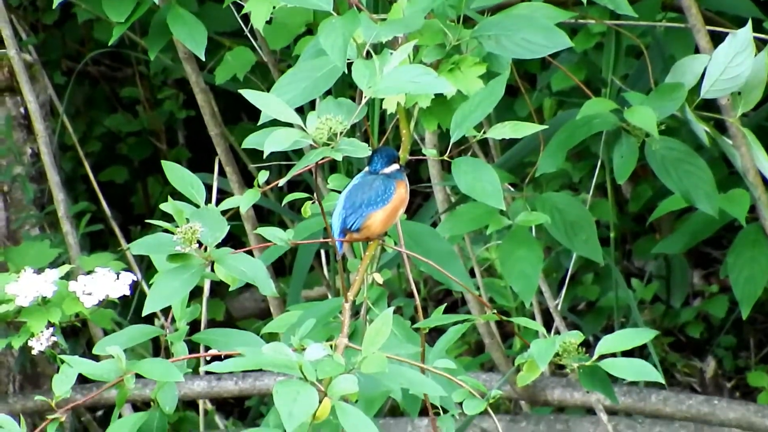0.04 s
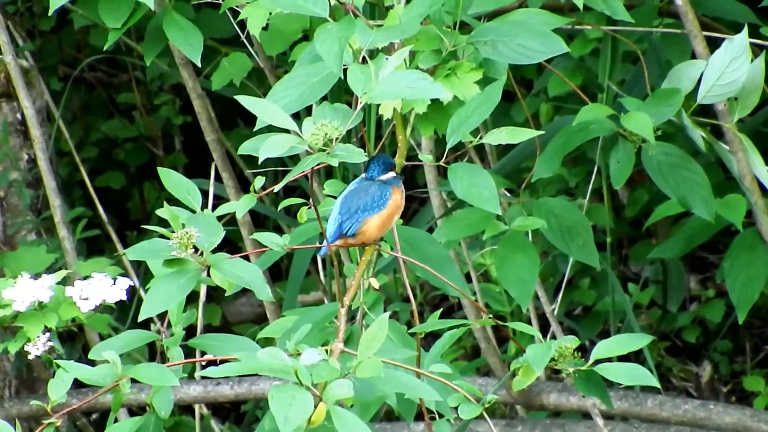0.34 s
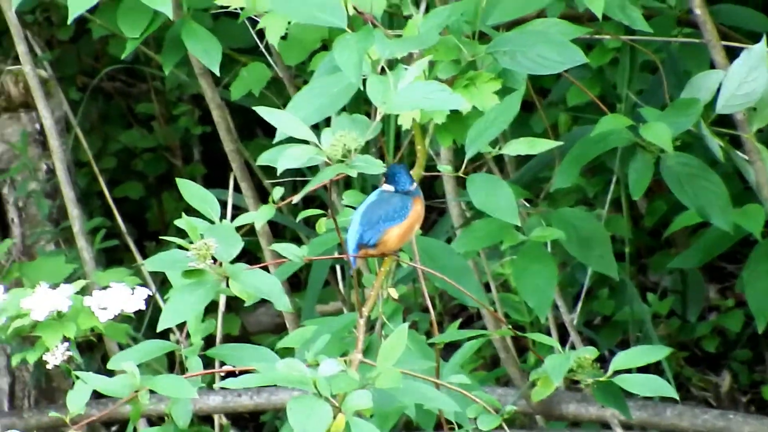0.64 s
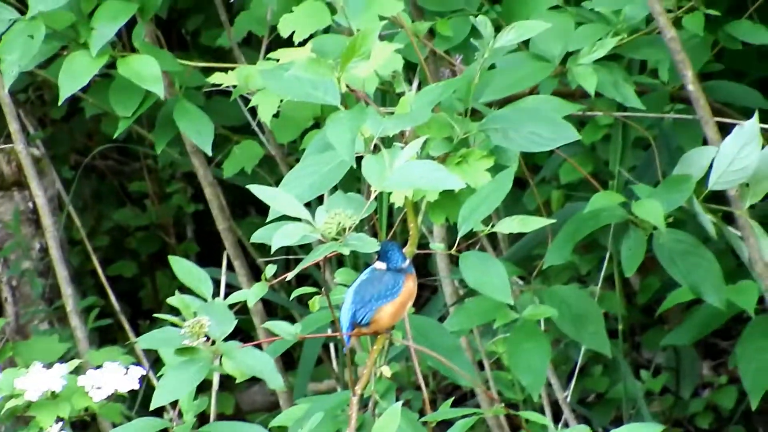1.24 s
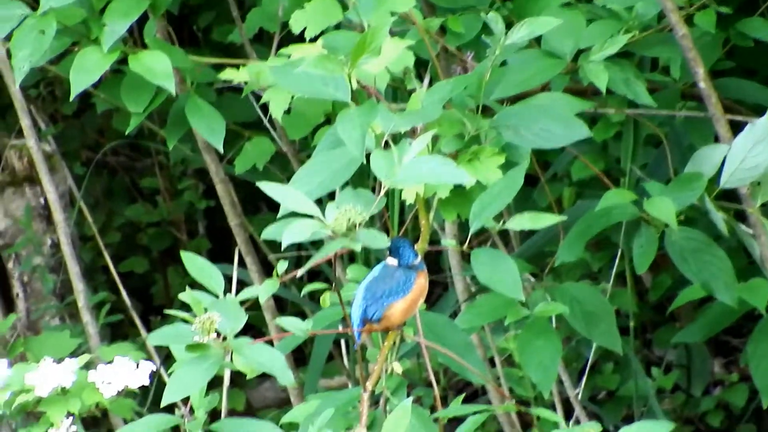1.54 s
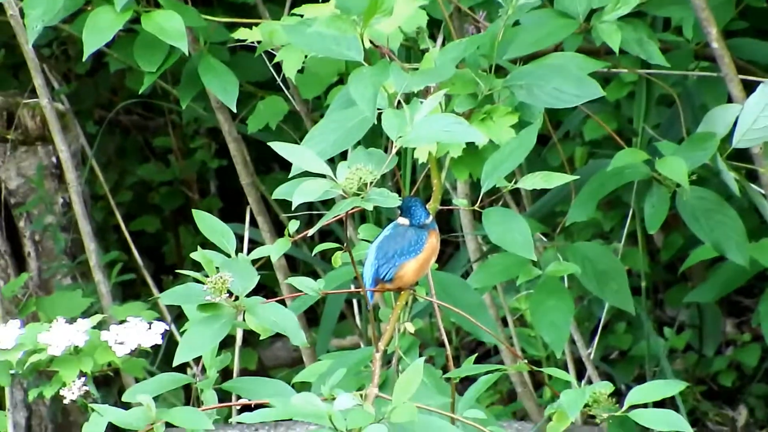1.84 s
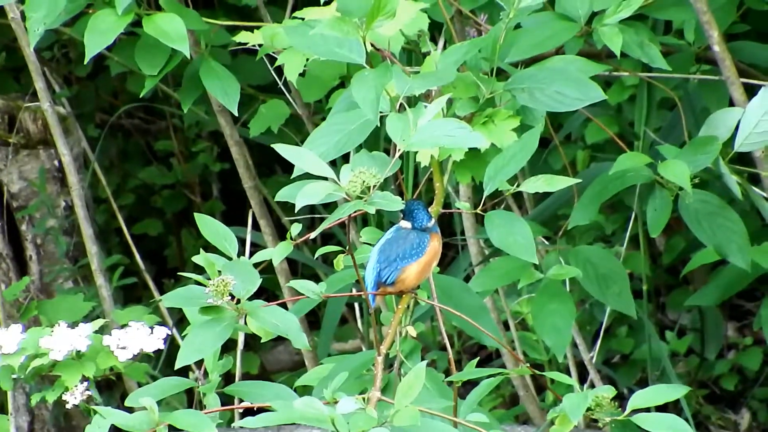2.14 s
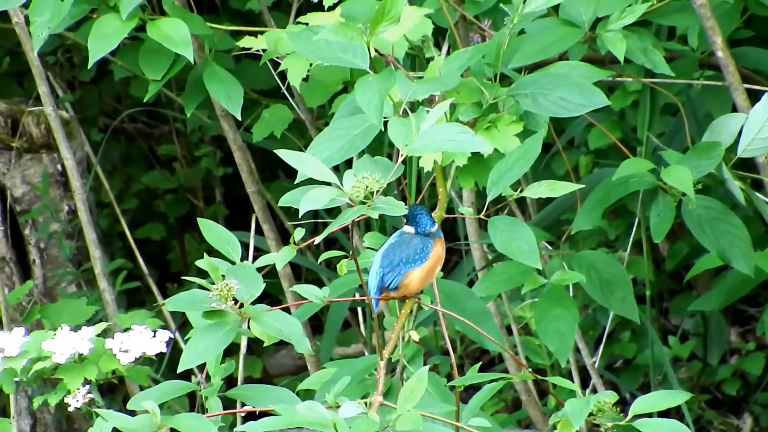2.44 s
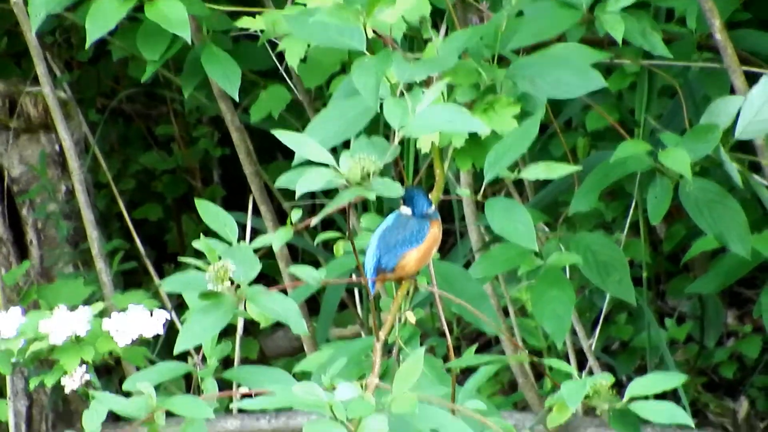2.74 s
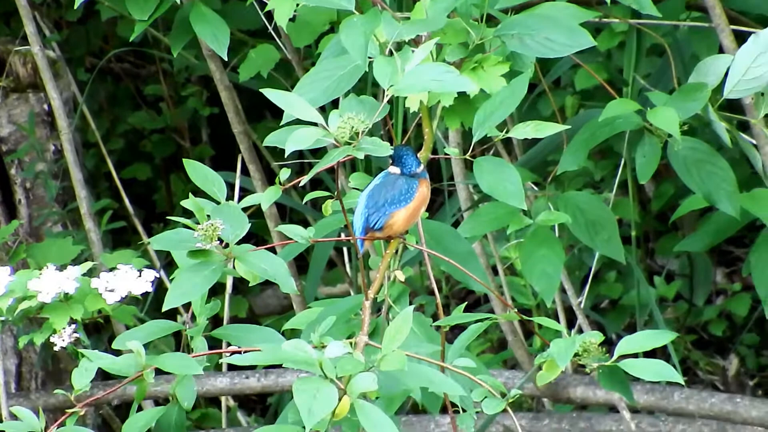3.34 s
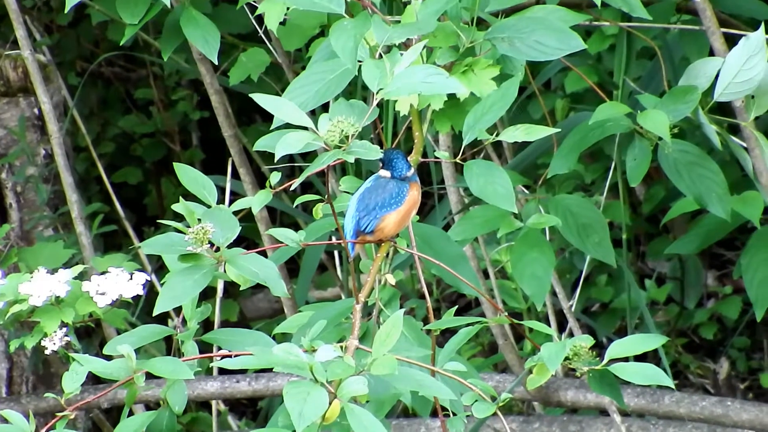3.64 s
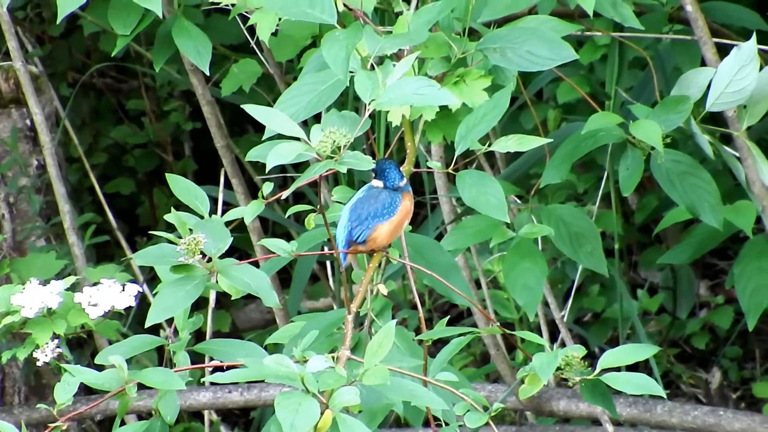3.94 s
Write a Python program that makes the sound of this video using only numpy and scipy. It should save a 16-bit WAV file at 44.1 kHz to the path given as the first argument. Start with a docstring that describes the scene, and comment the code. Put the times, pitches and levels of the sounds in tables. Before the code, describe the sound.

A stream rushes and bubbles steadily beside a wooded bank. Small birds chirp and rasp nearby at first, one whistle sweeps up, then a lower, distant song grows fuller. Soft puffs of air touch the microphone.

```python
"""On a wooded bank, a stereo microphone beside a steadily rushing, bubbling stream. Soft puffs of air
touch it at the start and now and then later. In the first second and a half small birds chirp and rasp
close by in the leaves, a lower song slurs down from deep in the trees, and very high two-voiced calls
begin. Just after two seconds one whistle sweeps up and holds; the far song is fullest near the end."""
import sys
import numpy as np
from scipy import signal
from scipy.fft import rfft, irfft
from scipy.io import wavfile

SR = 44100
rng = np.random.default_rng(int(sys.argv[2]) if len(sys.argv) > 2 else 0)


def transcribe(signal):
    """Save signal, clipped to [-1, 1], as a 16-bit WAV file at the path in sys.argv[1]."""
    frames = np.atleast_2d(signal).T
    limited = np.clip(frames, -1, 1)
    pcm = np.round(limited * 32767).astype(np.int16)
    wavfile.write(sys.argv[1], SR, pcm)


N = 176400
TIME = np.arange(N) / SR


def from_db(db):
    """Decibels to gain."""
    return 10 ** (np.asarray(db) / 20)


def rms_one(x):
    """Scale to unit power."""
    return x / np.sqrt(np.mean(x ** 2) + 1e-20)


def drift(rate_hz):
    """Smooth random wandering with a spread of 1."""
    hz = np.arange(N // 2 + 1) * SR / N
    return rms_one(irfft(rfft(rng.standard_normal(N)) / (1 + (hz / rate_hz) ** 2), N))


def density(points, hz):
    """Gain that gives unit white noise the listed level per hertz."""
    at, db = np.transpose(points)
    return from_db(np.interp(np.log(hz + 1), np.log(at), db)) * np.sqrt(SR / 2)


def add(track, s, sound):
    """Mix a sound into a track at a time."""
    start = max(int(s * SR), 0)
    part = sound[:max(N - start, 0)]
    track[start:start + len(part)] += part


def tone(hz):
    """A sine on a pitch path that swells and fades."""
    return np.sin(np.pi * np.linspace(0, 1, len(hz))) * np.sin(2 * np.pi * np.cumsum(hz) / SR)


def notes(rows, swing, swing_hz, turn):
    """Bird notes glide unsteadily through three pitches, turning after a share of their length."""
    out, wobble = np.zeros(N), 1 + swing * drift(swing_hz)
    for s, length, start, middle, end, db in rows:
        hz = np.interp(np.linspace(0, 1, int(length * SR)), [0, turn, 1], [start, middle, end])
        add(out, s, from_db(db) * tone(hz * np.roll(wobble, -int(s * SR))[:len(hz)]))
    return out


def wood(x, echo_db, t60, first_echo_s=0.0097, echoes_per_s=900, width=0.24):
    """Trunks and leaves around the microphone scatter many small dying echoes; stereo."""
    t = TIME[:SR]
    taps = rng.standard_normal((2, SR)) * (rng.random((2, SR)) < echoes_per_s / SR)
    taps = taps * from_db(-60 * t / t60) * (t > first_echo_s)
    mid, side = (signal.fftconvolve(x, h / np.sqrt(np.sum(h ** 2) + 1e-20))[:N] for h in taps)
    return from_db(echo_db) * np.array([mid + width * side, mid - width * side])


def trunk(x, delay_s=0.027, echo_db=-10):
    """A nearby trunk throws back one distinct echo."""
    return from_db(echo_db) * np.interp(TIME - delay_s, TIME, x, left=0)


def stream_rush(flicker_db=0.75, flicker_hz=15, swell_above_hz=1800):
    """Heard from the bank, countless splashes merge into noise whose half-octave bands flicker apart."""
    # rush common to both channels: f/Hz, level/dB per Hz
    centre = [(30, -134), (65, -116), (110, -115), (190, -99.5), (270, -90.5), (420, -86.5), (600, -87.5),
              (800, -85), (1300, -85), (1650, -87.5), (2300, -84), (3400, -82), (4300, -84.5),
              (5000, -93.5), (5900, -107), (8500, -109.5), (10500, -114.5), (15500, -121)]
    # its diffuse part, opposite in the two channels: f/Hz, level/dB per Hz
    diffuse = [(30, -133), (100, -117), (190, -102), (280, -103.5), (400, -99), (680, -100), (790, -96),
               (900, -100), (1300, -102), (2200, -100), (4200, -99), (5200, -106), (6400, -103),
               (7600, -112), (10000, -114.5), (15500, -123)]
    # slow swell of the upper bands: t/s, gain/dB
    swell = [(0, 0.5), (.5, 0), (.85, 1.05), (1.25, 0.5), (1.45, 0), (2, -0.6), (2.6, -0.2), (3.2, -.6),
             (3.6, 0), (4, 0)]
    hz = np.arange(N // 2 + 1) * SR / N
    mid, side = (rfft(rng.standard_normal(N)) * density(p, hz) for p in (centre, diffuse))
    channels, out = np.array([mid + side, mid - side]), 0
    swell_db = np.interp(TIME, *np.transpose(swell))
    edges = np.r_[0, np.geomspace(125, 16000, 15)]
    for low, high in zip(edges, edges[1:]):
        band = irfft(channels * ((hz >= low) & (hz < high)), N)
        out = out + band * from_db(flicker_db * drift(flicker_hz) + swell_db * (high > swell_above_hz))
    return out


def bubbles(per_s=900, low_hz=1300, high_hz=4300, pitches=18, cycles=33, spread_db=3.5, level_db=-67):
    """Single bubbles in the stream each ring briefly at one pitch."""
    sizes = from_db(spread_db * np.minimum(rng.exponential(1, N), 5)) * rng.choice([-1, 1], N)
    kicks = sizes * (rng.random(N) < per_s / SR)
    pitch_index, out = rng.integers(0, pitches, N), 0
    for k, hz in enumerate(np.geomspace(low_hz, high_hz, pitches)):
        decay = np.exp(-np.log(1000) * hz / cycles / SR)  # 60 dB down after that many cycles
        angle = 2 * np.pi * hz / SR
        resonator = [0, np.sin(angle)], [1, -2 * decay * np.cos(angle), decay * decay]
        out = out + signal.lfilter(*resonator, kicks * (pitch_index == k) + 1e-18)
    lowpass = signal.butter(8, high_hz, fs=SR, output="sos")
    return from_db(level_db) * rms_one(signal.sosfilt(lowpass, out))


def air_puffs(low_hz=103):
    """Air buffets each microphone port with its own low rumble."""
    # puffs: t/s, half length/s, left level/dB, right level/dB, upper edge f/Hz
    puffs = [(0.008, 0.0096, -48, -70, 222), (0.046, 0.011, -60, -78, 172), (0.075, 0.024, -46, -61, 410),
             (0.152, .045, -65.5, -71, 200), (0.263, 0.033, -75, -70, 200), (0.568, 0.02, -61, -56.5, 205),
             (0.875, 0.027, -63.5, -75, 210), (1.01, 0.025, -69, -80, 169), (1.743, 0.027, -71, -69, 170),
             (2.806, 0.021, -72, -62, 179), (2.993, 0.15, -74.5, -75, 180)]
    out, white = 0, rng.standard_normal((2, N + SR))
    for s, half, left, right, top_hz in puffs:
        band = signal.butter(3, [low_hz, top_hz], "band", fs=SR, output="sos")
        rumble = rms_one(signal.sosfilt(band, white)[:, SR:])
        out = out + rumble * from_db([[left], [right]]) * np.exp(-((TIME - s) / half) ** 2)
    return out


def far_song():
    """Deep in the trees a bird sings lower notes, most of them slurring down."""
    # notes: t/s, length/s, start f/Hz, middle f/Hz, end f/Hz, peak level/dB before the mix
    song = [(.41, 0.2, 2465, 2290, 2150, -53), (.59, .27, 2160, 2130, 2086, -53.5),
            (.79, 0.18, 2465, 2038, 1840, -54.5), (1.28, 0.086, 2666, 2680, 2610, -51),
            (1.57, 0.31, 2740, 2470, 2260, -52), (2.815, 0.036, 1930, 2105, 2250, -50.5),
            (2.97, 0.075, 2150, 2126, 1930, -53.5), (3.24, 0.13, 2170, 2080, 2140, -51),
            (3.36, 0.067, 2180, 2210, 2070, -47.5), (3.38, 0.13, 1900, 1787, 1690, -51),
            (3.49, .04, 2380, 2390, 2370, -48.5), (3.53, .15, 2915, 2460, 2100, -47),
            (3.595, .105, 2482, 2345, 2180, -44.5), (3.625, .125, 2150, 2063, 1966, -42.5),
            (3.755, 0.06, 2060, 2048, 1970, -46.5), (3.80, .25, 2042, 1960, 1870, -50.5),
            (3.87, 0.15, 2130, 2155, 2230, -50.5)]
    return notes(song, swing=0.017, swing_hz=180, turn=0.5)


def thin_calls(lower_ratio=0.835, lower_db=-2, swing=0.0065, swing_hz=350):
    """Both sides of the syrinx sound together, very high: a quick rise, then a slide down."""
    # upper voice: t/s, length/s, top f/Hz, peak level/dB
    calls = [(0.712, 0.052, 8600, -64.5), (0.857, 0.075, 8550, -65.5), (2.376, 0.047, 7900, -70),
             (2.68, .03, 8500, -73), (2.817, 0.042, 8800, -71), (2.997, .035, 8900, -72),
             (3.235, 0.027, 8400, -73), (3.368, 0.045, 8500, -74)]
    # pitch path: share of the length, share of the top pitch
    contour = [(0, 0.88), (.2, 1), (.6, 0.935), (1, .88)]
    out = np.zeros(N)
    for ratio, voice_db in ((1, 0), (lower_ratio, lower_db)):
        wobble = 1 + swing * drift(swing_hz)
        for s, length, top, db in calls:
            hz = ratio * top * np.interp(np.linspace(0, 1, int(length * SR)), *np.transpose(contour))
            add(out, s, from_db(db + voice_db) * tone(hz * np.roll(wobble, -int(s * SR))[:len(hz)]))
    return out


def rasps():
    """A bird in the leaves gives falling notes, made hoarse by a fast, wide wobble in pitch."""
    # notes: t/s, length/s, start f/Hz, middle f/Hz, end f/Hz, peak level/dB
    hoarse_notes = [(.58, 0.067, 4500, 4014, 3520, -46.5), (.757, 0.044, 3830, 3650, 2790, -44),
                    (.912, 0.043, 3600, 3540, 2900, -42.5), (1.005, .035, 4130, 4160, 3970, -50),
                    (1.076, .042, 3520, 3506, 2630, -42.5), (1.185, .06, 4200, 3930, 3560, -48),
                    (1.243, 0.028, 4000, 3830, 3400, -45.5), (1.266, 0.023, 3350, 3030, 2450, -43.5)]
    return notes(hoarse_notes, swing=0.065, swing_hz=480, turn=0.56)


def whistle(at_s=2.134, length_s=0.17, from_hz=3000, to_hz=4410, rise_s=0.009, level_db=-47):
    """Close by, one thin note shoots up to its pitch, holds and fades unevenly."""
    fade_db_per_s, flutter_db, swing, edge_s = -68, 2.0, 0.0039, 0.004
    out, t = np.zeros(N), TIME[:int(length_s * SR)]
    flutter = drift(rate_hz=60)[:len(t)]
    hz = (to_hz + (from_hz - to_hz) * np.exp(-t / rise_s)) * (1 + swing * flutter)
    ramps = np.minimum(np.minimum(t, t[::-1]) / edge_s, 1)
    level = from_db(level_db + fade_db_per_s * t + flutter_db * flutter) * ramps
    add(out, at_s, level * np.sin(2 * np.pi * np.cumsum(hz) / SR))
    return out


def near_chirps():
    """Near the microphone a small bird gives short, clear, gliding chirps."""
    # notes: t/s, length/s, start f/Hz, middle f/Hz, end f/Hz, peak level/dB
    clear_notes = [(.262, .02, 3460, 3174, 3120, -44), (.314, 0.031, 3630, 3176, 3080, -40),
                   (.379, 0.037, 3674, 3200, 3196, -39.5), (.442, 0.025, 3930, 3150, 3100, -38.5),
                   (.621, 0.0195, 3830, 3150, 2890, -36.5), (.635, 0.02, 2850, 2580, 2710, -42.5),
                   (.651, 0.025, 2800, 3100, 3180, -41), (1.527, 0.014, 3130, 3380, 3640, -41),
                   (1.549, 0.014, 3700, 3500, 3200, -38.5), (1.559, 0.027, 3295, 3080, 3080, -40.5)]
    return notes(clear_notes, swing=0.0064, swing_hz=310, turn=0.344)


def scene(far_direct_db=-1.9):
    """From the bank: water, near and far birds among the trees, and air on the microphone."""
    chirps = near_chirps()
    near = chirps + trunk(chirps) + whistle()
    hoarse, far, thin = rasps(), far_song(), thin_calls()
    echoes = (wood(near, echo_db=-8.5, t60=0.13) + wood(hoarse, echo_db=-3, t60=0.25)
              + wood(far, echo_db=-5.5, t60=0.44) + wood(thin, echo_db=-2, t60=0.13))
    birds = near + hoarse + from_db(far_direct_db) * far + thin
    return stream_rush() + bubbles() + birds + echoes + air_puffs()


def record(dry, cutoff_hz=15700):
    """The microphone has two narrow notches and a steep cut at the top."""
    # dips in its response: f/Hz, width/Hz
    notches = [(224, 19), (1102, 337)]
    for hz, width in notches:
        dry = signal.lfilter(*signal.iirnotch(hz, hz / width, fs=SR), dry)
    return signal.sosfilt(signal.ellip(12, .1, 80, cutoff_hz, fs=SR, output="sos"), dry)


dry = scene()
out = record(dry)
transcribe(out)
```